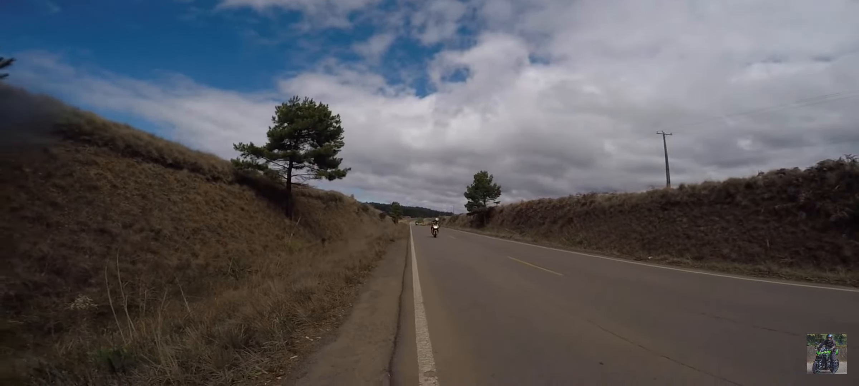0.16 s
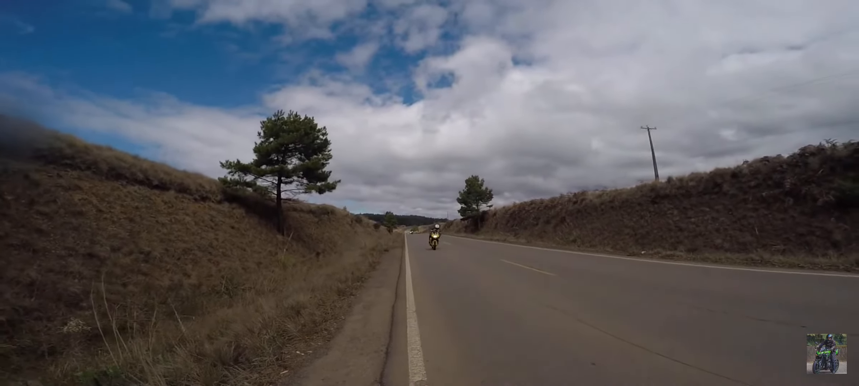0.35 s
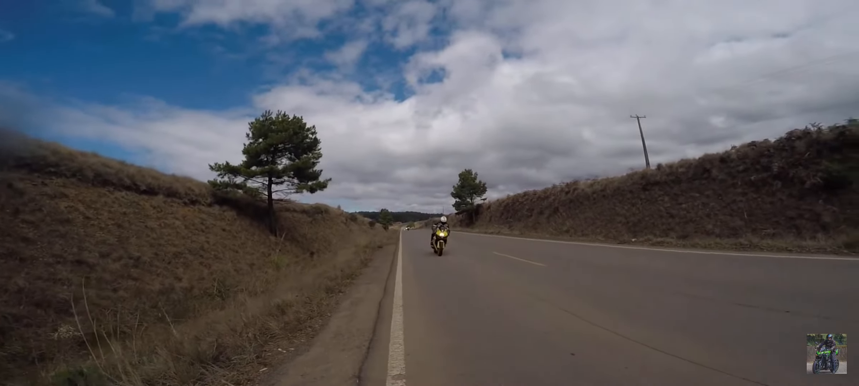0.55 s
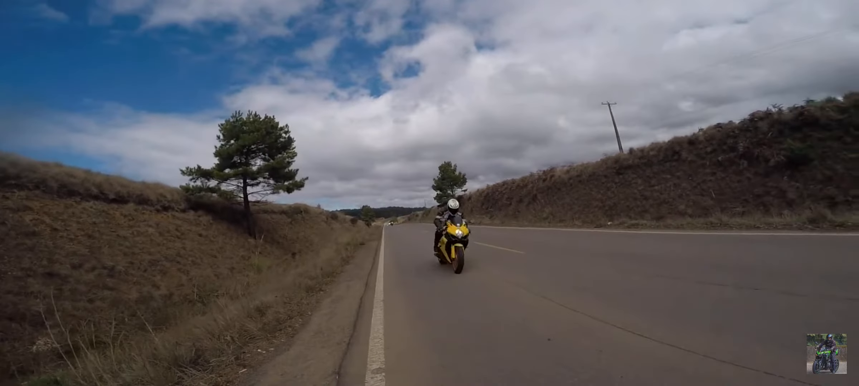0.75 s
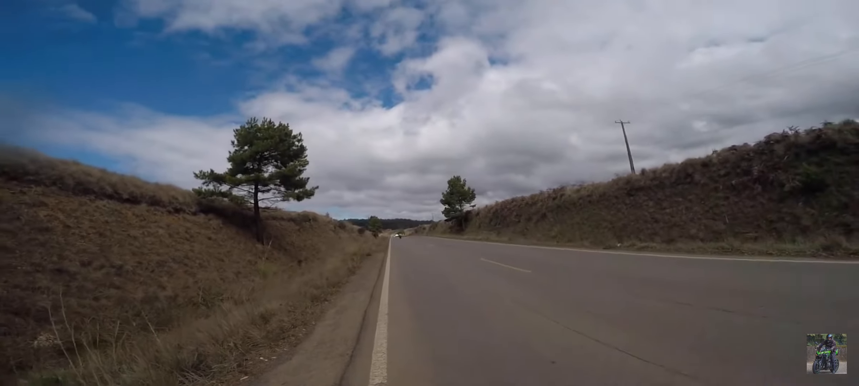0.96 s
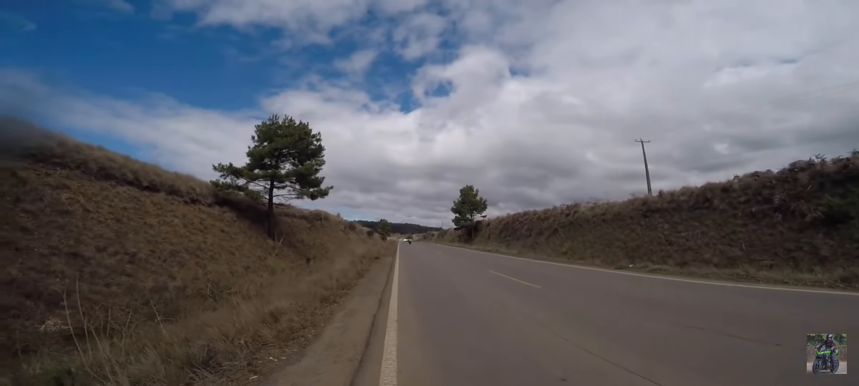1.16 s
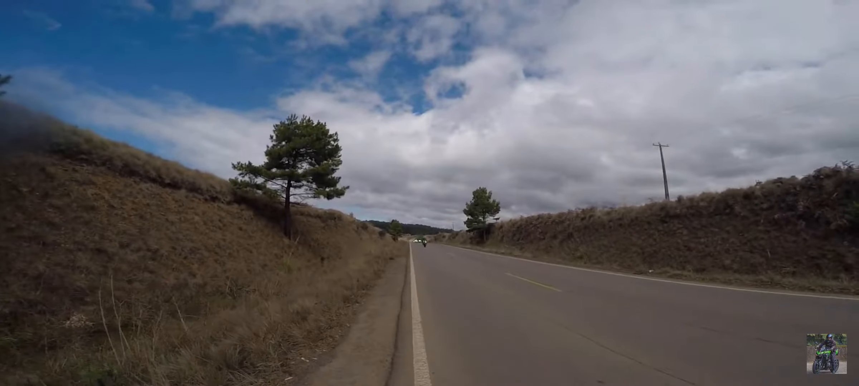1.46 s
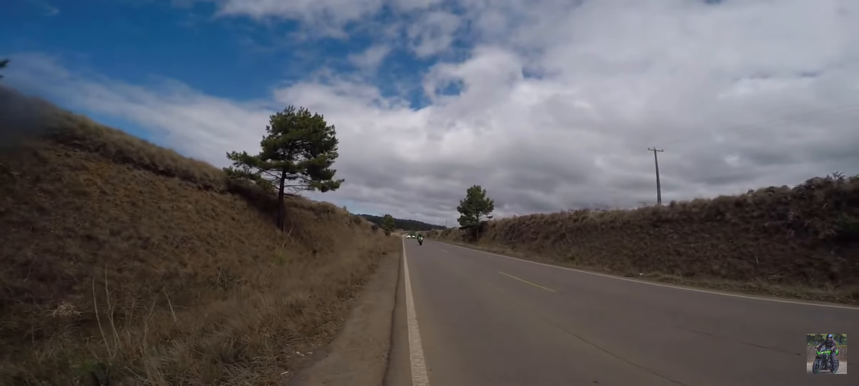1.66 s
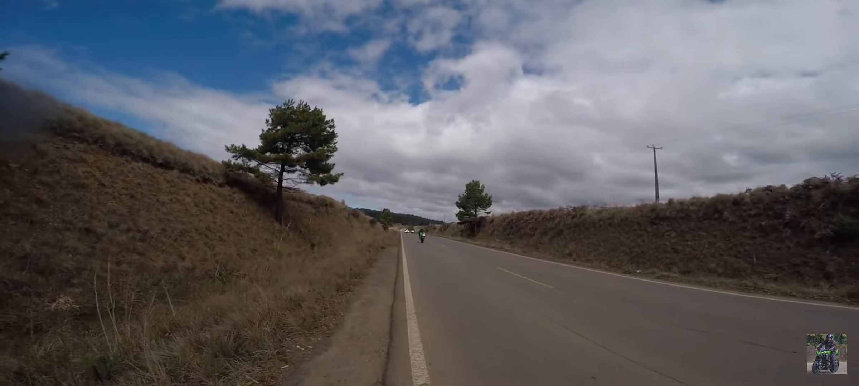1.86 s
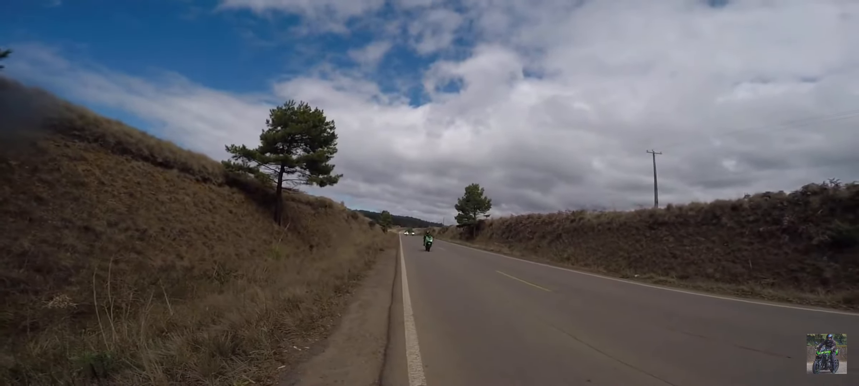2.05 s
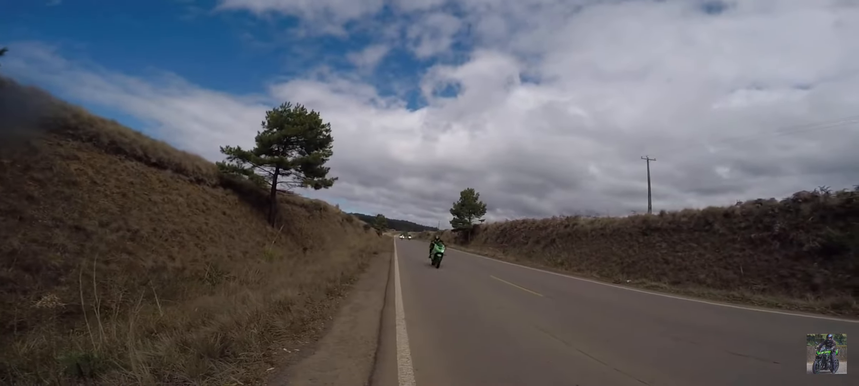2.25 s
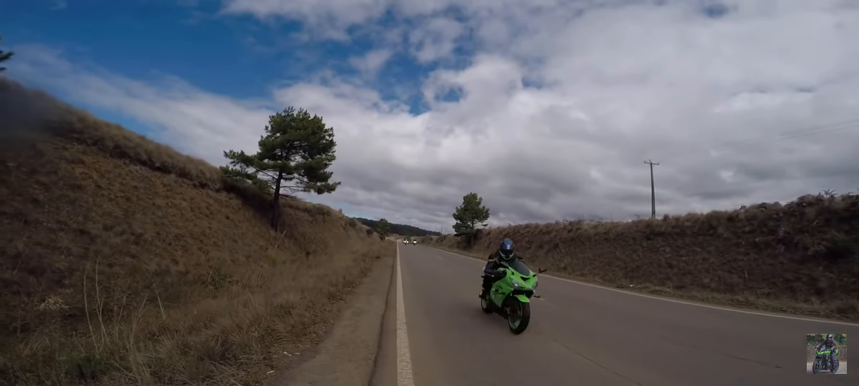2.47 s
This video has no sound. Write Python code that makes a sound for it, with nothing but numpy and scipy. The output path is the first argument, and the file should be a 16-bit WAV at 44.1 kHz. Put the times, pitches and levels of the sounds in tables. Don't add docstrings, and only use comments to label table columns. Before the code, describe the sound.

Sport motorcycle roars up, sweeps past and drops in pitch, then a higher one screams closer

```python
import sys
import numpy as np
from scipy import signal
from scipy.fft import rfft, irfft
from scipy.io import wavfile

SR = 44100
rng = np.random.default_rng(int(sys.argv[2]) if len(sys.argv) > 2 else 0)


def digitize_waveform(pressure):
    field = np.atleast_2d(pressure).T
    bounded = np.clip(field, -1, 1)
    quanta = np.round(bounded * 32767).astype(np.int16)
    wavfile.write(sys.argv[1], SR, quanta)


def ratio(d):
    e = np.asarray(d, float) / 20
    return 10 ** e


N = 115101
T_S = np.arange(N) / SR

# time [s], level [dB].
GAIN = [(0.0, -32), (0.35, -30), (0.78, -15), (0.92, -9), (1.0, -3.5), (1.07, -1), (1.39, -14),
        (1.91, -21.5), (2.06, -19.5), (2.57, -4.5), (2.61, 1)]


def in_time(rows):
    s, *columns = np.transpose(rows)
    return [np.interp(T_S, s, column) for column in columns]


def rms_one(x):
    return x / np.sqrt(np.mean(x ** 2) + 1e-20)


def band(x, order, low_hz, high_hz):
    sos = signal.butter(order, [low_hz, high_hz], "band", fs=SR, output="sos")
    return signal.sosfilt(sos, x)


def drift(rate_hz):
    r = np.exp(-40 * np.pi * rate_hz / SR)
    noise = rng.standard_normal(N // 20 + 2002)
    slow = signal.lfilter([1], [1, -2 * r, r * r], noise)[2000:]
    return np.interp(np.arange(N) / 20, np.arange(len(slow)), rms_one(slow))


def smooth_change(at_s, width_s):
    return .5 + .5 * np.tanh((T_S - at_s) / width_s)


def capsule_hiss():
    return signal.lfilter([.6], [1, -.4], rng.standard_normal((3, N)))


def wind():
    # time in s, level in dB after the gain control.
    wind_rows = [
        (0.0, -28.5),
        (0.13, -24),
        (0.44, -29.5),
        (0.46, -26),
        (0.81, -51.5),
        (1.23, -43),
        (1.93, -31.5),
        (2.61, -43),
    ]
    level_db, = in_time(wind_rows)
    rumble = band(rng.standard_normal(N + SR), 2, 22, 116)[SR:]
    return ratio(level_db + .5 * drift(10)) * rms_one(rumble)


def grit_tick():
    tick_s, decay_s, centre_hz, level_db = 1.574, .00086, 7200, -42
    t = T_S - tick_s
    burst = rng.standard_normal(N) * (t > 0) * np.exp(-np.abs(t) / decay_s)
    return ratio(level_db) * band(burst, 2, .55 * centre_hz, 1.55 * centre_hz)


def whines():
    # middle in s, half length in s, pitch in Hz, glide in Hz per s, level in dB.
    whine_rows = [
        (0.019, 0.031, 3050, 2, -49),
        (0.93, 0.054, 1385, -300, -39),
        (2.204, 0.11, 2700, 301.5, -52),
        (2.6, 0.044, 3300, -2, -52.5),
        (.95, 0.074, 4700, -2500, -51.5),
    ]
    width_hz = 51
    out = 0
    for middle_s, half_s, pitch_hz, glide, level_db in whine_rows:
        t = T_S - middle_s
        phase = 2 * np.pi * (pitch_hz * t + glide * t ** 2 / 2)
        tone = (1 + drift(width_hz)) * np.cos(phase) + drift(width_hz) * np.sin(phase)
        out = out + ratio(level_db) * np.exp(-(t / half_s) ** 4) * tone
    return out


def coloured(x, spectrum):
    # centre in Hz, width in Hz, gain in dB.
    port_cavities = [(2016, 300, 6), (2720, 470, 0.5), (3283, 1100, 8), (4840, 810, 5), (3960, 240, -5)]
    ripple_db, ripple_hz = 3, 110
    f = np.fft.rfftfreq(N, 1 / SR) + 1
    at_hz, at_db = np.transpose(spectrum)
    shape_db = np.interp(np.log(f), np.log(at_hz), at_db)
    for centre_hz, width_hz, gain_db in port_cavities:
        shape_db = shape_db + gain_db / (1 + (2 * (f - centre_hz) / width_hz) ** 2)
    ripple = ripple_db * rng.standard_normal(300)
    shape_db = shape_db + np.interp(f / ripple_hz, np.arange(300), ripple) * np.minimum(f / 2500, 1)
    return rms_one(irfft(rfft(x) * ratio(shape_db), N))


def clatter(crank):
    old, new = rng.standard_normal((2, 201))
    place = (crank / (2 * np.pi) % 1 * 200).astype(int)
    blend = drift(1.5)
    x = np.cos(blend) * old[place] + np.sin(blend) * new[place]
    return band(x, 3, 1500, 5500)


def cancelled(order, nulls, flips):
    gain = 1
    for which, null_s, half_s in nulls:
        if which == order:
            fade = np.tanh((null_s - T_S) / half_s) + .15j
            gain = gain * (fade if flips else np.abs(fade))
    return gain


def pipe_mouth_db(tone_hz, flare_db):
    return flare_db / (1 + (2 * (tone_hz - 675) / 280) ** 4)


def engine(rows, early, late, change, spectrum, nulls, flare_db, sign, pipe, uneven, flips,
           jitter, shimmer_db, gate, repeat):
    firing_hz, tone_db, rasp_db = in_time(rows)
    crank = np.cumsum(np.pi * firing_hz / SR) + jitter * drift(38)
    tones = 0
    for (order, early_db), (_, late_db) in zip(early, late):
        waver_db = shimmer_db * drift(14) * min(abs(order - 2) + .4, 1.3)
        mouth_db = pipe_mouth_db(order * firing_hz / 2, flare_db)
        stray = .028 * abs(order - 2) ** .9 * drift(25)
        pipe_phase = pipe * (order > 7.5) * (1.8 + .55 * (order - 8))
        phase = order * crank + pipe_phase - uneven * order * (order % 2) + stray
        level = ratio(early_db + (late_db - early_db) * change + waver_db + mouth_db)
        tones = tones + level * np.real(cancelled(order, nulls, flips) * np.exp(1j * phase))
    puffs = np.exp(gate * np.cos(2 * crank) + .3 * gate * np.cos(crank) + .06 * drift(30))
    rasp = coloured(puffs * (rng.standard_normal(N) + repeat * clatter(crank)), spectrum)
    arrive_s, leave_s = 1, .028
    heard = np.clip(1 + (T_S - rows[0][0]) / arrive_s, 0, 1) ** 2
    heard = heard * np.clip(1 - (T_S - rows[-1][0]) / leave_s, 0, 1) ** 2
    return heard * (sign * np.sqrt(2) * ratio(tone_db) * tones + ratio(rasp_db) * rasp)


def second_bike():
    # time in s, firing rate in Hz, firing tone in dB, rasp in dB, after the gain control.
    second_run = [(1.4, 405.3, -46, -64.5), (1.66, 415.5, -35, -59.5), (1.76, 427.4, -27.5, -51),
                  (1.91, 431.5, -21.5, -45), (2.07, 441.7, -17.5, -48.5), (2.21, 448.8, -18, -36),
                  (2.39, 461, -17.5, -37.5), (2.46, 461.1, -18, -37), (2.51, 466, -18.5, -37),
                  (2.54, 459.1, -17.5, -31), (2.575, 458.9, -18.5, -31.5), (2.61, 449.5, -14, -29.5)]
    # multiple of crank rate, level in dB.
    far_orders = [(0.5, -25), (1, -19), (1.5, -36), (2, 2.5), (2.5, -23), (3, -23), (3.5, -32.5), (4, -8.5),
                  (4.5, -28.5), (5, -14), (5.5, -53), (6, -55), (6.5, -34), (7, -26), (7.5, -33), (8, -27),
                  (8.5, -31), (9, -44.5), (9.5, -34.5), (10, -58), (10.5, -59), (11, -61), (11.5, -34),
                  (12, -30.5), (12.5, -43.5), (13, -34.5), (13.5, -54.5), (14, -43)]
    near_orders = [(0.5, -32), (1, -27.5), (1.5, -33), (2, 0.5), (2.5, -31), (3, -36), (3.5, -25), (4, -1),
                   (4.5, -24), (5, -15.5), (5.5, -26.5), (6, -13.5), (6.5, -28), (7, -35), (7.5, -33.5),
                   (8, -27.5), (8.5, -37), (9, -41), (9.5, -39.5), (10, -48), (10.5, -53), (11, -56),
                   (11.5, -34), (12, -42.5), (12.5, -36), (13, -38.5), (13.5, -46), (14, -61.5)]
    # frequency in Hz, level in dB per Hz.
    second_rasp = [(70, -12), (200, -1), (1000, -11.5), (1600, -11.5), (2300, -26), (4000, -24),
                   (9500, -35.5), (13500, -52)]
    # crank order, time in s, half width in s.
    second_nulls = [(4, 2.365, .07), (6, 2.472, .03), (5, 2.5, .035), (2, 2.524, .035), (4, 2.543, .018),
                    (6, 2.55, .012), (5, 2.568, .01), (4, 2.606, .02), (6, 2.606, .015)]
    return engine(second_run, far_orders, near_orders, smooth_change(2.372, .1), second_rasp,
                  second_nulls, 0, sign=-1, pipe=0, uneven=0, flips=True,
                  jitter=.012, shimmer_db=.9, gate=.45, repeat=1.2)


def first_bike():
    # time in s, firing rate in Hz, firing tone in dB, rasp in dB, after the gain control.
    first_run = [(0, 195.1, -22.5, -27), (.14, 193.2, -22, -31), (.38, 196.7, -17.5, -29),
                 (.8, 198.7, -18.5, -29.5), (.92, 197.7, -17.5, -27.5), (.97, 191.4, -15, -27),
                 (1.01, 184.9, -19, -25), (1.06, 168.1, -27.5, -37.5), (1.11, 168, -27, -43),
                 (1.28, 167.4, -27, -46), (1.43, 167.9, -24.5, -43), (1.7, 167.2, -24, -41.5),
                 (2.12, 165, -25.5, -34.5), (2.2, 174.5, -32, -33), (2.25, 181.2, -32, -52),
                 (2.36, 160.5, -35.5, -52.5), (2.45, 152.4, -45, -44)]
    # multiple of crank rate, level in dB.
    coming_orders = [(1, -14.5), (2, 2), (3, -17), (4, -5), (5, -10), (6, -7.5), (7, -16), (8, -6.5),
                     (9, -16), (10, -18.5), (11, -21.5), (12, -22.5), (13, -34), (14, -34), (15, -36.5),
                     (16, -45.5)]
    going_orders = [(1, -18.5), (2, 1.5), (3, -20.5), (4, -8), (5, -16.5), (6, -11), (7, -26.5), (8, -19),
                    (9, -64), (10, -28.5), (11, -35), (12, -35), (13, -33.5), (14, -28), (15, -39.5),
                    (16, -66.5)]
    # frequency in Hz, level in dB per Hz.
    first_rasp = [(70, -6), (200, -1.5), (800, -5), (1300, -14), (2300, -31), (4000, -32), (9500, -47.5),
                  (13500, -62.5)]
    # crank order, time in s, half width in s.
    first_nulls = [(8, .923, .03), (6, .95, .01), (4, 1.0, .06), (3, 1.02, .05), (5, 1.0, .04)]
    flare_db = 7.5 * np.exp(-((T_S - 1) / .034) ** 2)
    return engine(first_run, coming_orders, going_orders, smooth_change(1.016, .075), first_rasp,
                  first_nulls, flare_db, sign=1, pipe=1, uneven=.13, flips=False,
                  jitter=.02, shimmer_db=1, gate=.2, repeat=.4)


def scene():
    duck_db, = in_time(GAIN)
    sources = wind() + grit_tick() + whines() + second_bike() + first_bike()
    air = ratio(duck_db + 4.5) * sources
    return np.array([air, air])


def top_cut(x):
    return signal.sosfilt(signal.butter(12, 13700, fs=SR, output="sos"), x)


def record(dry):
    duck_db, = in_time(GAIN)
    seal_hz, seal_db, leak_db, limit = 260, -3.5, -26.5, 1
    sealed = signal.lfilter(*signal.butter(1, seal_hz, fs=SR), dry[0])
    left = ratio(seal_db) * sealed + ratio(leak_db) * dry[0]
    left = signal.lfilter([0, 0, 1], [1], left)
    right = limit * np.tanh(dry[1] * ratio(-duck_db) / limit)
    right = right * np.minimum(np.arange(N) / 40, 1)
    hiss = capsule_hiss()
    mix = np.array([left, right]) + ratio(-80) * hiss[:2] + ratio(-73) * hiss[2]
    return top_cut(mix)


dry = scene()
out = record(dry)
digitize_waveform(out)
```